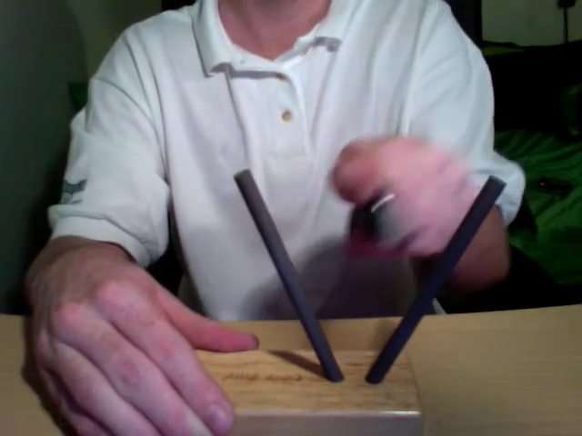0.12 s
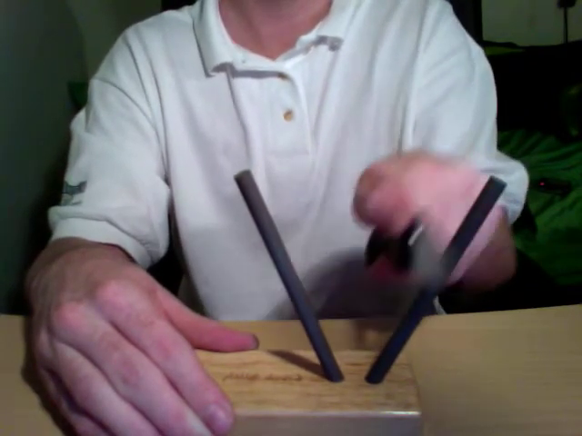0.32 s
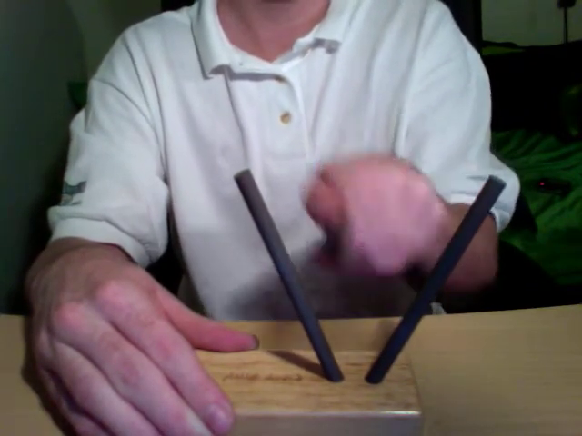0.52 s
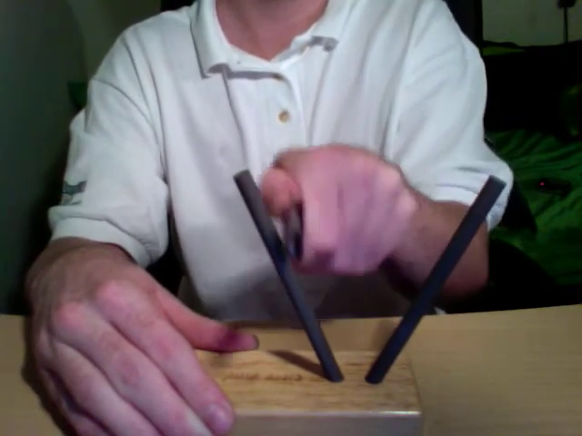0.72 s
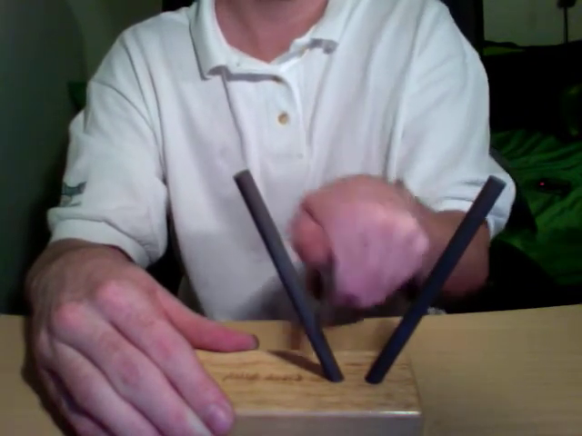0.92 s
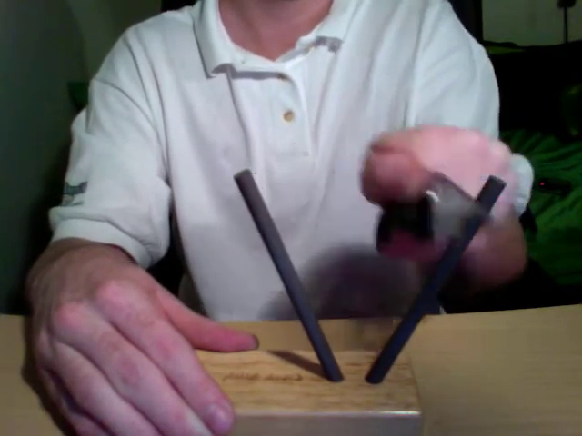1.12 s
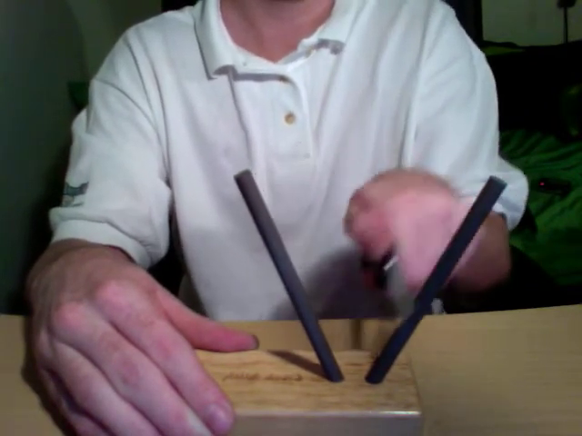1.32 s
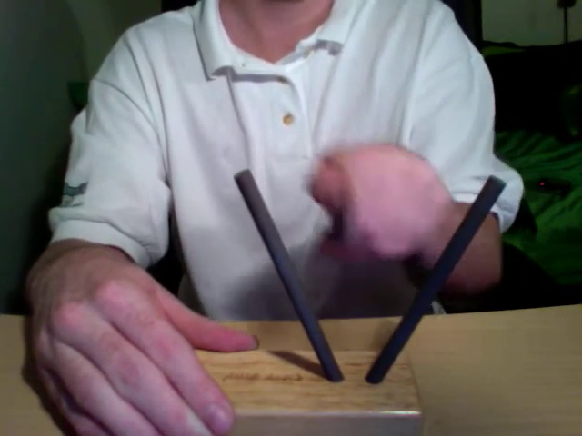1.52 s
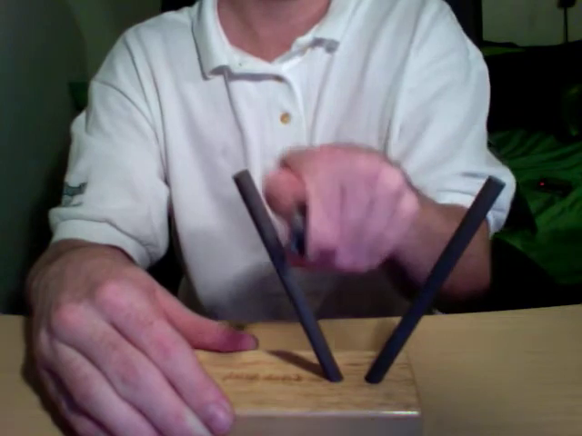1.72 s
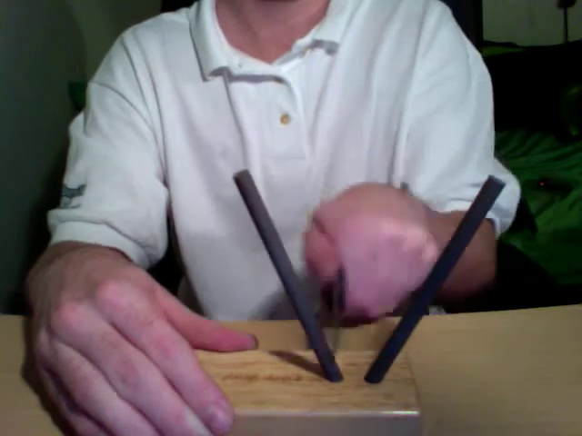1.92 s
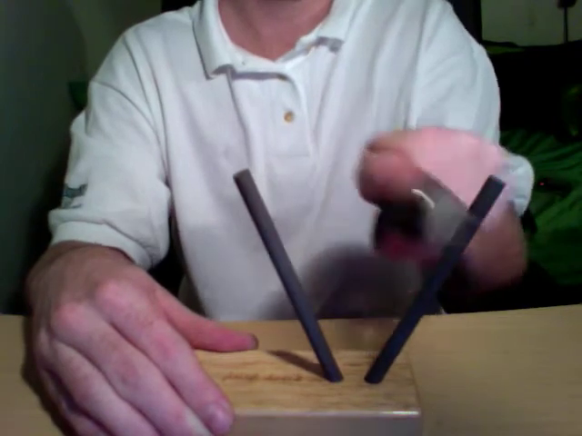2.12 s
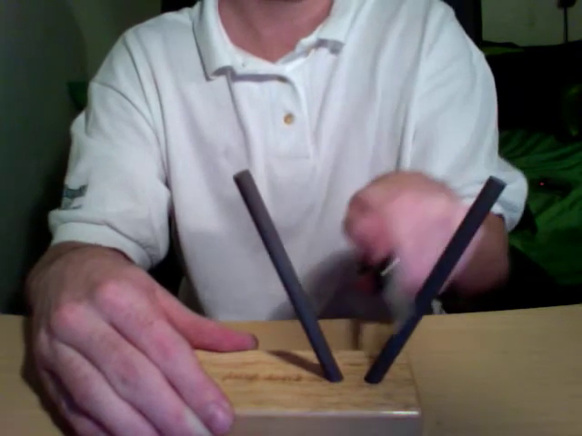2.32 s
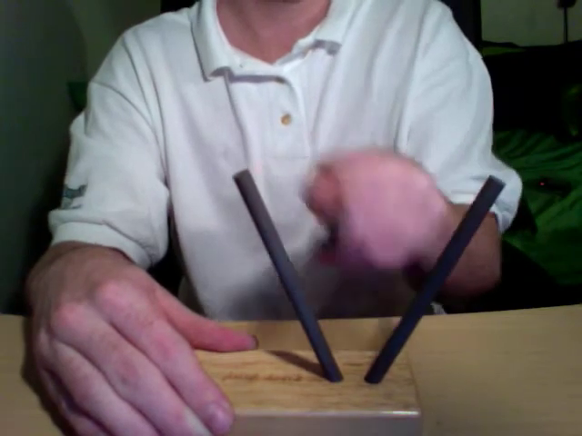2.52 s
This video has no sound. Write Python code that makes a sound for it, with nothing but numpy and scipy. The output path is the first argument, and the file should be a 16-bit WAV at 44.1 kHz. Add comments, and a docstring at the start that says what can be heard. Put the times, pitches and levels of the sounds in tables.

```python
"""First the last ring of a stroke fades in a small, quiet room; then a steel knife is drawn down two ceramic
rods set in a V in a wooden base, right and left in turn. Each stroke lands with a hard tick (noise crack and
damped modes) that thumps the base (lower damped modes), then rasps: noise as grit drives the resonances of blade
and rod, which swell and glide as the contact travels from heel to tip. The freed tip rings briefly.
Near-wall echoes and a diffuse tail answer, over faint air noise and a soft hum."""
import sys
import numpy as np
from scipy import signal
from scipy.fft import rfft, irfft, next_fast_len
from scipy.io import wavfile
from scipy.ndimage import map_coordinates

SR = 44100
rng = np.random.default_rng(int(sys.argv[2]) if len(sys.argv) > 2 else 0)


def transcribe(signal):
    """Save signal, clipped to [-1, 1], as a 16-bit WAV file at the path in sys.argv[1]."""
    frames = np.atleast_2d(signal).T
    limited = np.clip(frames, -1, 1)
    pcm = np.round(limited * 32767).astype(np.int16)
    wavfile.write(sys.argv[1], SR, pcm)


N = 119070

# Levels are relative within each layer; pairs of rows or values are right rod, left rod.
# strokes: start_s, rod (0 right, 1 left), length_s, tick_db, thump_db, rasp_db, song_db, pitch_ratio,
# push_place (0 heel - 1 tip), push_spread (stroke lengths), push_db, hiss_db
STROKES = [(-.275, 1, 0.23, -9, -23.5, -42.5, 1, 1.38, 0.78, 0.08, 0.5, -2.5),
           (0.2258, 0, 0.25, -5.5, -20, -39, 4, 1, 0.63, 0.13, 2, 0.5),
           (0.713, 1, 0.24, -20, -35.5, -38.5, -1, 0.89, 0.88, .2, -4, -2),
           (1.2208, 0, 0.24, -9, -24.5, -40, 0.5, 1, 0.73, 0.13, 2, 0.5),
           (1.7033, 1, 0.28, -15.5, -27, -42, 3, 0.97, 0.67, 0.11, 2.5, 2),
           (2.231, 0, 0.24, -6, -24.5, -40, 2.5, 0.952, .76, 0.13, 4, 0.5)]
# rubbed resonances of each rod: centre_hz, width_hz, level_db, best_place (0-1), spread (stroke lengths)
RIGHT_RUB = [(184, 83, -7, 0, .35), (330, 170, -13.5, 0.08, 0.55), (616, 170, -10.5, 0.52, 0.52),
             (830, 370, -5, 0.6, 0.43), (1135, 78, -7.5, .87, 0.28), (1405, 43, -10, 0.4, 0.28),
             (1724, 140, -4.5, .55, 0.33), (2160, 300, -6, 0.5, 0.14), (2648, 180, -6.5, 0.6, 0.39),
             (3178, 770, -8, 0.63, 0.21), (4132, 620, -6, 0.1, .5), (5060, 500, -12.5, 0, 0.73),
             (5824, 590, -15.5, 0.5, .35), (7800, 510, -19.5, 0.2, 0.43), (8800, 1000, -18, .25, .2),
             (8940, 1200, -17.5, .9, 0.12)]
LEFT_RUB = [(176, 107, -57, .1, 0.22), (397, 130, -12.5, 0.61, 0.44), (693, 240, -7, 1, 0.66),
            (835.4, 190, -1.5, 0.62, 0.38), (1145, 110, -3.5, .8, 0.15), (1970, 570, 3.5, .72, 0.15),
            (2497, 1400, -1, 1, 0.48), (3080, 420, -10, 0.52, .22), (3900, 400, -11, 0.42, 0.45),
            (5150, 1300, -21, .2, 0.37), (7160, 1800, -21.5, .55, 0.295), (9380, 1500, -30.5, 0.76, 0.14)]
# bending note of the blade, before pitch_ratio: heel_hz, tip_hz, width_hz, level_db
BLADE = [(1710, 3700, 360, -0.5), (1703, 2250, 98, 4.5)]
# higher blade mode, brought out by a push: centre_hz, width_hz, level_db (re the note)
OVERTONE = [(3350, 530, -14), (3380, 340, -9)]
# broad hiss of the grit, spectrum: freq_hz, level_db (per Hz)
RIGHT_HISS = [(70, -38.5), (200, -7), (900, 6.5), (2500, 18.5), (5000, -6.5), (6800, 0.5), (9000, -26.5),
              (10500, -6.5), (15000, -14), (17000, -29.5)]
LEFT_HISS = [(70, -34), (200, -6), (900, 7), (2500, 8), (4200, -5.5), (6000, -2), (9000, -14),
             (10500, -8.5), (15000, -15), (17000, -51)]
# hiss on each rod: level_db
HISS_DB = [-6.5, -7]
# change of the hiss from heel to tip: change_db
HISS_FADE_DB = [3.5, -10.5]
# blade ringing on as the tip leaves each rod: centre_hz, width_hz, level_db, t60_s
TIP_RING = [(2700, 1900, -21.5, 0.067), (2040, 670, -12, 0.16)]
# struck modes of each rod: pitch_hz, level_db, t60_s
RIGHT_TICK = [(322, -26, 0.059), (607.6, -20.5, 0.022), (832, -17.5, 0.041), (1367, -15.5, 0.026),
              (1531, -11, .018), (1773, -12, 0.027), (2620, -11, 0.02), (3040, -16.5, 0.019),
              (3802, -8, 0.014), (4330, -7, 0.014), (4750, -10.5, 0.0077), (4940, -24, 0.011),
              (6195, -25.5, 0.028), (9100, -21.5, 0.0061)]
LEFT_TICK = [(276.6, -15.5, .045), (551, -22, 0.061), (925, -21.5, 0.051), (1650, -1, 0.0063),
             (1835, -3.5, 0.022), (2750, -12.5, 0.066), (3610, -11.5, 0.024), (4740, -15.5, 0.004),
             (5520, -4.5, 0.0082), (6800, -14.5, 0.015), (9000, -13, 0.0082)]
# delay from first touch until the edge seats and the modes ring: delay_s
SEAT_S = [0.00033, 0.00113]
# impact crack, spectrum: freq_hz, level_db (per Hz)
CRACK = [(80, -34), (300, 7), (1500, 0.5), (4500, 4.5), (7500, -9), (11000, -15.5), (16000, -22.5)]
# crack on each rod: level_db
CRACK_DB = [-13, -7.5]
# struck modes of wooden base and table: pitch_hz, level_db, t60_s
THUMP = [(130, -12, 0.19), (178.4, 2, 0.089), (208, -2, .06), (273, -8, 0.097)]
# near-wall echoes: delay_s, level_db
WALLS = [(.0031, -17.5), (0.0172, -21.5)]
# decay of the room tail: freq_hz, t60_s
ROOM_T60 = [(150, 0.32), (700, 0.31), (2200, 0.32), (5000, 0.22), (9000, 0.18), (15000, 0.25)]
# level of the room tail: freq_hz, level_db
ROOM_SEND = [(150, -10.5), (700, -16.5), (2200, -16), (5000, -10.5), (9000, -10.5), (15000, -22)]
# room air noise, spectrum: freq_hz, level_db (per Hz)
QUIET = [(15, -84.5), (25, -44.5), (80, -28), (117, -14), (236, -6), (309, -20), (416, -10.5), (451, -23.5),
         (607, -12.5), (1260, -26), (3820, -35.5), (5880, -37.5), (16000, -51)]

GLIDE_POWER = 4.48  # the note climbs ever faster towards the tip
ATTACK_S, RELEASE_S = 0.0027, 0.0097  # time constants of the contact
GRIT_ROUGH = 0.4  # spread of grain sizes, natural-log units
JUDDER_DB, JUDDER_PER_S = 2.5, 170  # standard deviation and rate of random points
CATCH_DB, CATCH_PER_S = 1.38, 35  # likewise, slower: the edge catches and slips unevenly
TICK_ATTACK_S, CRACK_T60_S = 0.00047, 0.021
THUMP_ATTACK_S, THUMP_DELAY_S = 0.0037, 0.0017
LOW_CUT_HZ, TOP_HZ = 160, 16300
QUIET_DB = -74
HUM_HZ, HUM_WIDTH_HZ, HUM_DB = 232.6, 26, -74
LEAD_S = 1  # the knife track starts this early
TAIL_BUILD_S = 0.0045


def amp(db):
    """Decibels to gain."""
    return 10 ** (np.asarray(db) / 20)


def unit(x):
    """Scaled to rms 1."""
    return x / np.sqrt(np.mean(x ** 2) + 1e-20)


def along(points, hz):
    """Values interpolated between (Hz, value) points on a log axis."""
    point_hz, values = np.transpose(points)
    return np.interp(np.log(hz + 1), np.log(point_hz + 1), values)


def coloured(x, spectrum):
    """x shaped by (Hz, dB) points."""
    m = next_fast_len(len(x) + 4096)
    gain = amp(along(spectrum, np.fft.rfftfreq(m, 1 / SR)))
    return irfft(rfft(x, m) * gain, m)[:len(x)]


def add(track, start_s, sound):
    """Mix a sound into the track, cropped at both ends."""
    i = round(start_s * SR)
    part = sound[max(-i, 0):max(len(track) - i, 0)]
    track[max(i, 0):][:len(part)] += part


def resonance(x, hz, width_hz):
    """x through a double-pole resonance whose centre may move; rms 1."""
    turn = np.exp(2j * np.pi * np.cumsum(hz * np.ones(len(x))) / SR)
    pole = np.exp(-np.pi * abs(width_hz) / SR)
    # shift the centre to 0 Hz, low-pass, shift back
    low = signal.lfilter([1], [1, -2 * pole, pole * pole], x / turn)
    return unit((low * turn).real)


def ring(modes, t, attack_s):
    """Damped modes after one blow, in alternating polarity."""
    total = 0
    for k, (hz, db, t60_s) in enumerate(modes):
        total = total + (-1) ** k * amp(db - 60 * t / t60_s) * np.sin(2 * np.pi * hz * t)
    return (1 - np.exp(-t / attack_s)) * total


def background():
    """Faint air noise plus a soft, wavering hum: noise through a narrow resonance."""
    air = unit(coloured(rng.standard_normal(N), QUIET))
    hum = resonance(rng.standard_normal(N), HUM_HZ, HUM_WIDTH_HZ)
    return amp(QUIET_DB) * air + amp(HUM_DB) * hum


def room(x):
    """A few near walls and a short diffuse tail whose decay depends on frequency."""
    hz, t, z = signal.stft(rng.standard_normal(SR // 2), SR, nperseg=256)
    fade = amp(-60 * t / along(ROOM_T60, hz)[:, None]) * (1 - np.exp(-t / TAIL_BUILD_S))
    # equal energy per band before the send levels
    fade = fade / np.sqrt(np.mean(fade ** 2, axis=1, keepdims=True) * (SR // 2))
    send = amp(along(ROOM_SEND, hz))[:, None]
    echo = signal.istft(z * fade * send, SR, nperseg=256)[1]
    for delay_s, db in WALLS:
        echo[round(delay_s * SR)] += amp(db)
    return signal.fftconvolve(x, echo)[:len(x)]


def base_thump():
    """The blow excites damped low modes of wooden base and table."""
    return ring(THUMP, np.arange(SR // 3) / SR, THUMP_ATTACK_S)


def tip_ring(rod):
    """The freed blade shivers and dies away: decaying resonant noise."""
    t = np.arange(SR // 3) / SR
    hz, width_hz, db, t60_s = TIP_RING[rod]
    return amp(db - 60 * t / t60_s) * resonance(rng.standard_normal(len(t)), hz, width_hz)


def tick(rod):
    """Steel lands on ceramic: a noise crack, then briefly ringing modes."""
    t = np.arange(SR // 8) / SR
    noise = unit(coloured(rng.standard_normal(len(t)), CRACK))
    crack = noise * amp(CRACK_DB[rod] - 60 * t / CRACK_T60_S) * (1 - np.exp(-t / TICK_ATTACK_S))
    modes = ring((RIGHT_TICK, LEFT_TICK)[rod], np.maximum(t - SEAT_S[rod], 0), TICK_ATTACK_S)
    return modes + crack


def grit(t):
    """Countless tiny impacts of uneven size, clumped as the edge judders and catches; rms 1."""
    noise, sizes, fast, slow = rng.standard_normal((4, len(t)))
    judder = map_coordinates(fast, [t * JUDDER_PER_S], order=1)
    catch = map_coordinates(slow, [t * CATCH_PER_S], order=1)
    return unit(noise * np.exp(GRIT_ROUGH * sizes) * amp(JUDDER_DB * judder + CATCH_DB * catch))


def blade_song(rod, t, place, song_db, pitch_ratio):
    """Grit drives the blade's gliding bending note and a fixed higher mode."""
    heel_hz, tip_hz, width_hz, db = BLADE[rod]
    note_hz = pitch_ratio * (heel_hz + (tip_hz - heel_hz) * place ** GLIDE_POWER)
    note = resonance(grit(t), note_hz, width_hz)
    over_hz, over_width_hz, over_db = OVERTONE[rod]
    overtone = amp(over_db) * resonance(grit(t), over_hz, over_width_hz)
    return amp(db + song_db) * (note + overtone)


def rasp(rod, length_s, song_db, pitch_ratio, push_place, push_spread, push_db, hiss_db):
    """Edge slides heel to tip; each resonance is driven best at its own place, a push makes the blade sing."""
    t = np.arange(SR // 2) / SR
    place = np.minimum(t / length_s, 1)
    release = np.exp(-np.maximum(t - length_s + RELEASE_S, 0) / RELEASE_S)
    contact = (1 - np.exp(-t / ATTACK_S)) * release

    def swell(best, spread):
        return np.exp(-.5 * ((place - best) / spread) ** 2)

    hiss = unit(coloured(grit(t), (RIGHT_HISS, LEFT_HISS)[rod]))
    rub = amp(HISS_DB[rod] + hiss_db + HISS_FADE_DB[rod] * place) * hiss
    for hz, width_hz, db, best, spread in (RIGHT_RUB, LEFT_RUB)[rod]:
        rub = rub + amp(db) * swell(best, spread) * resonance(grit(t), hz, width_hz)
    song = blade_song(rod, t, place, song_db, pitch_ratio)
    push = swell(push_place, push_spread)
    return contact * amp(push_db * push) * (rub + push * song)


def knife():
    """Every stroke: tick, thump, rasp, tip ring; high-passed, as the small parts radiate little bass."""
    out = np.zeros(N + LEAD_S * SR)
    thump = base_thump()
    for start_s, rod, length_s, tick_db, thump_db, rasp_db, *gesture in STROKES:
        rod = int(round(rod))
        at_s = LEAD_S + start_s
        add(out, at_s, amp(tick_db) * tick(rod))
        add(out, at_s + THUMP_DELAY_S, amp(thump_db) * thump)
        add(out, at_s, amp(rasp_db) * rasp(rod, length_s, *gesture))
        add(out, at_s + length_s, amp(rasp_db) * tip_ring(rod))
    return signal.sosfilt(signal.butter(2, LOW_CUT_HZ, "high", fs=SR, output="sos"), out)


def scene():
    """The knife in the room, already at work when listening starts."""
    near = knife()
    heard = (near + room(near))[-N:]
    return (heard + background())[None]


def record(dry):
    """The microphone keeps nothing above its band limit."""
    m = next_fast_len(N + 4096)
    passed = np.fft.rfftfreq(m, 1 / SR) < TOP_HZ
    return irfft(rfft(dry, m) * passed, m)[:, :N]


dry = scene()
out = record(dry)
transcribe(out)
```